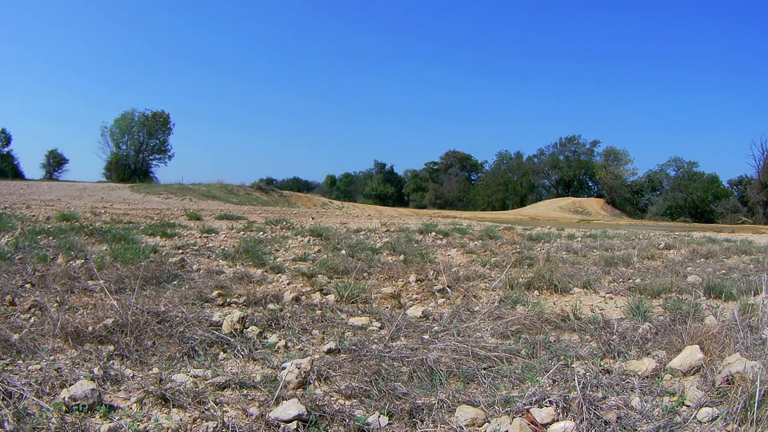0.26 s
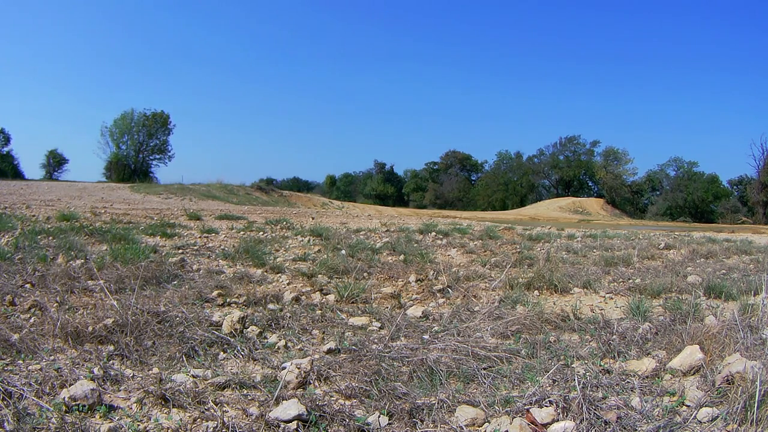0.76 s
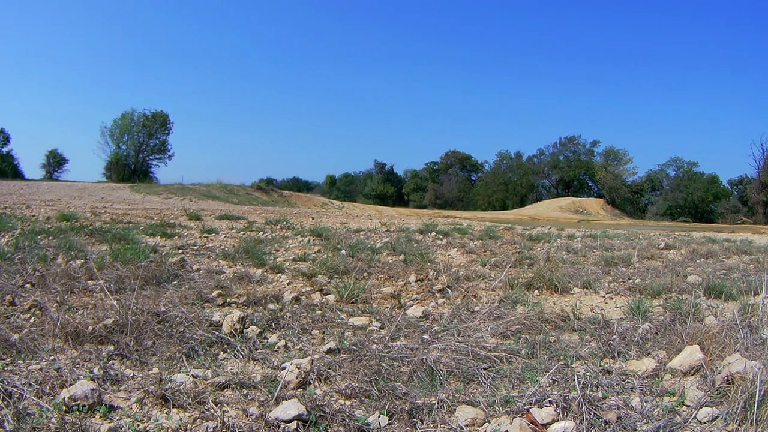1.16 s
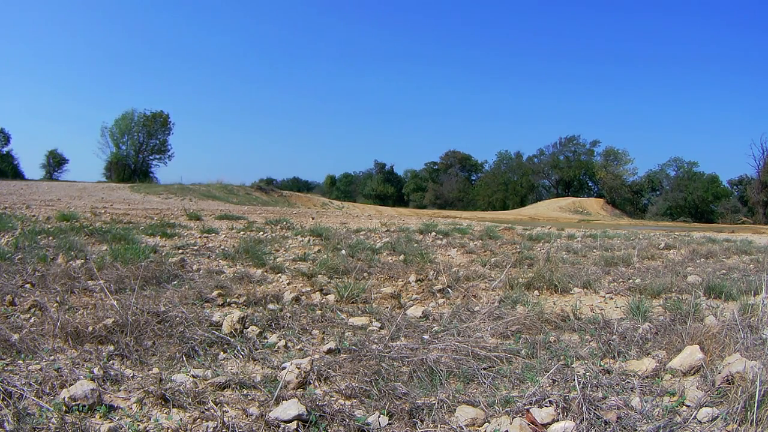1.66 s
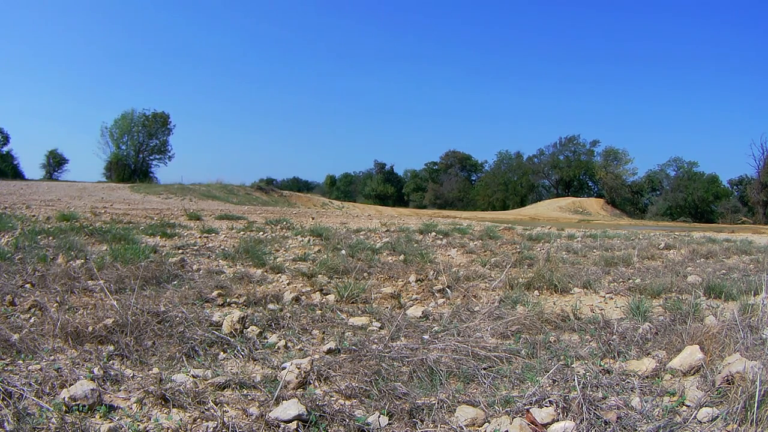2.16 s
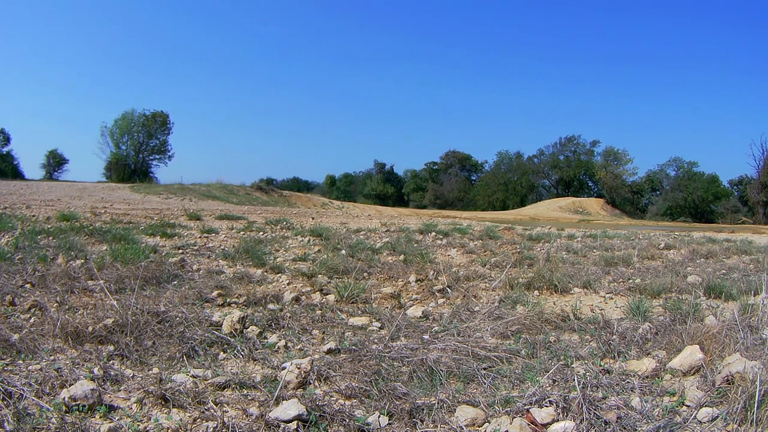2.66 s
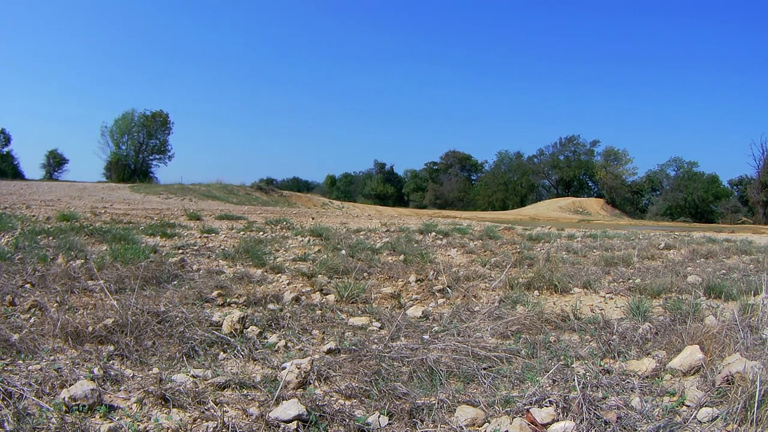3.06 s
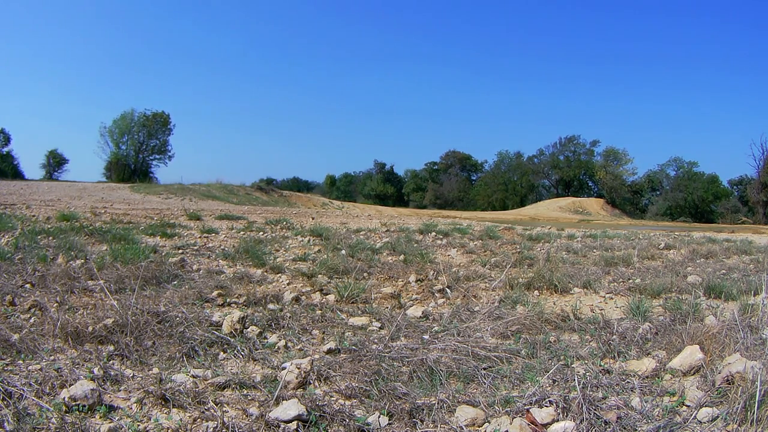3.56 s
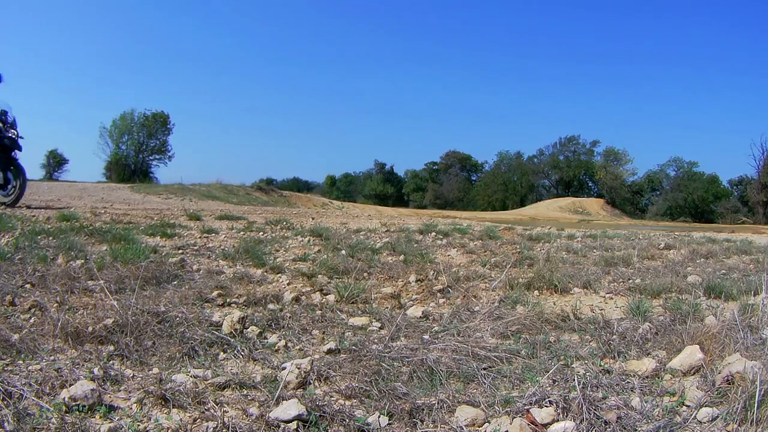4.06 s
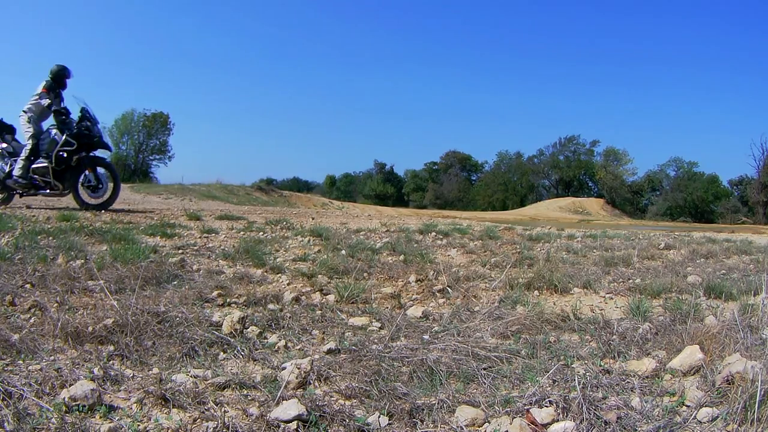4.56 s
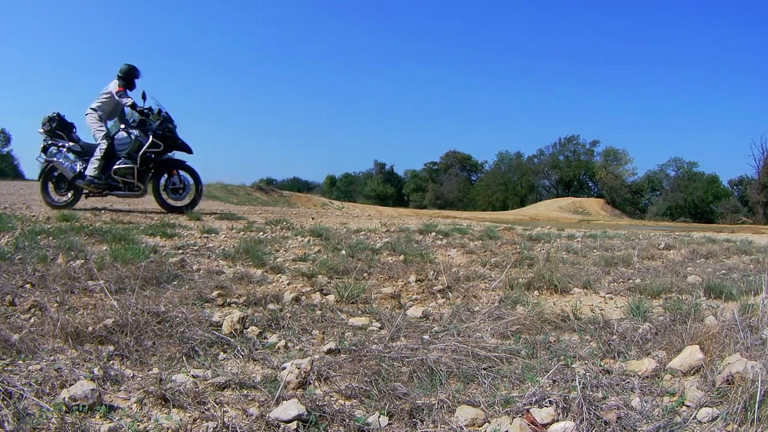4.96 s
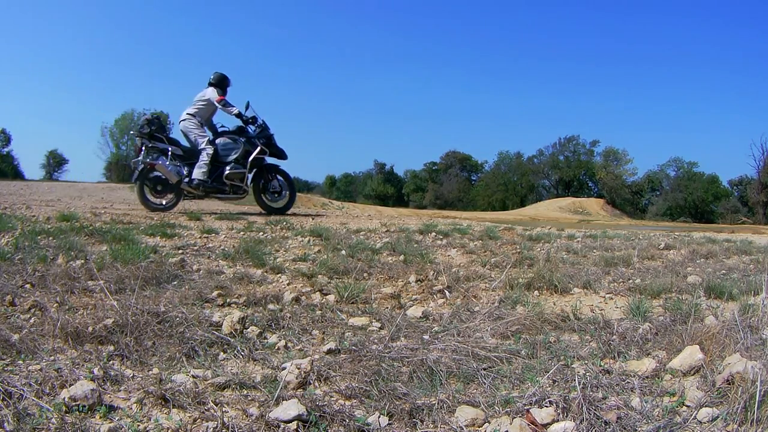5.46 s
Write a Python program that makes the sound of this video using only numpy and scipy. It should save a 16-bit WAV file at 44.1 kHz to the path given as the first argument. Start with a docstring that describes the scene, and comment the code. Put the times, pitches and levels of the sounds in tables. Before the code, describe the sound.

A twin-cylinder motorcycle thuds slowly closer just above idle, stones crunching under its tyres, with light wind on the microphone.

```python
"""An uneven strong-weak thudding is heard first: a twin-cylinder motorcycle, barely above idle, rolls
slowly closer over stony ground. Its exhaust pulses excite the silencer and pipe, while the engine
clatters, hisses and rings in step. Stones knock, crunch and snap under the tyres, the chassis thumps
and loose panels jangle. Gusts buffet the microphone as the bike nears; the camera whines faintly."""
import sys
import numpy as np
from scipy import signal
from scipy.fft import rfft, irfft
from scipy.io import wavfile
from scipy.ndimage import uniform_filter1d

SR = 44100
rng = np.random.default_rng(int(sys.argv[2]) if len(sys.argv) > 2 else 0)


def transcribe(u):
    """Save the signal u as a 16-bit wav file named by the first command-line argument.

    u: samples, shape (n,) or (channels, n), limited to [-1, 1]; the rate is SR.
    q: integer samples, one column per channel.
    """
    v = np.clip(np.atleast_2d(u).T, -1, 1)
    q = np.round(v * 32767).astype(np.int16)
    wavfile.write(sys.argv[1], SR, q)


N = 251370
TIME, FREQS = np.arange(N) / SR, np.fft.rfftfreq(N, 1 / SR)


def amp(db):
    """Decibels as an amplitude ratio."""
    return 10 ** (np.asarray(db) / 20)


def unit(x):
    """Normalisation to rms 1."""
    return x / np.sqrt(np.mean(x ** 2) + 1e-20)


def curve(table):
    """Linear interpolation of a time table at every sample."""
    return np.interp(TIME, *np.transpose(table))


def response(table, hz, column=1):
    """Magnitude response from a table in dB, rolling off beyond its ends."""
    columns = np.transpose(table)
    knots, db = columns[0], columns[column]
    knots = np.r_[knots[0] / 4, knots, knots[-1] * 3]
    db = np.r_[db[0] - 20, db, db[-1] - 35]
    return amp(np.interp(np.log(hz + 1), np.log(knots + 1), db))


def colour(x, table, column=1):
    """Zero-phase filtering by a spectrum table; rms 1."""
    return unit(irfft(rfft(x) * response(table, FREQS, column), N))


def impulse_response(table, column, size=16384):
    """Minimum-phase filter: the phase follows from the log magnitude by a Hilbert transform."""
    log_gain = np.log(response(table, abs(np.fft.fftfreq(size, 1 / SR)), column))
    return np.fft.ifft(np.exp(signal.hilbert(log_gain).conj())).real[:size // 4]


def drift(rate_hz):
    """Low-passed noise, a smooth random wandering; rms 1."""
    return unit(irfft(rfft(rng.standard_normal(N)) * np.exp(-(FREQS / rate_hz) ** 2), N))


def grains(per_s, spread_db):
    """Shot noise: tiny impacts of random time and size; rms 1."""
    size = amp(spread_db * np.minimum(rng.exponential(1, N), 4))
    return unit(size * rng.choice([-1, 1], N) * (rng.random(N) < per_s / SR))


def flutter(x, depth_db, width_hz=900, length_s=0.03):
    """Random amplitude modulation of each narrow band; rms 1."""
    hz, t, bands = signal.stft(x, SR, nperseg=256, noverlap=192)
    field = rng.standard_normal(bands.shape)
    field = uniform_filter1d(field, max(1, round(width_hz / hz[1])), axis=0)
    field = unit(uniform_filter1d(field, max(1, round(length_s / t[1])), axis=1))
    return unit(signal.istft(bands * amp(depth_db * field), SR, nperseg=256, noverlap=192)[1][:N])


def swell_power(events):
    """Incoherent addition: bell-shaped swells sum in power."""
    return sum(amp(db) ** 2 * np.exp(-((TIME - s) / half_s) ** 2) for s, half_s, db in events)


# The bike's path. Each row: time in seconds, distance from the microphone in metres.
PATH = [(0, 10.7), (1.2, 8.9), (2.5, 8.54), (3.2, 7.85), (3.6, 5.34), (4.15, 4.03), (5.7, 3.55)]
# The rider feathers the throttle. Each row: time in seconds, effort in dB.
EFFORT = [(0.04, -5.5), (0.32, -1), (0.58, -3.5), (0.85, -3.5), (0.97, -1), (1.18, -1.5), (1.65, -0.9),
          (1.95, 0), (2.14, -3.5), (2.33, 0), (2.55, -0.5), (2.74, 1.5), (2.9, -0.5), (3.02, 2), (5.35, 2),
          (5.55, 1)]
CLOSE_M, FAR_M = 3, 9.9


def carried_db(falloff, effort):
    """Geometric spreading (falloff 1 is the 1/r law), plus a share of the throttle's effort."""
    return -20 * falloff * np.log10(curve(PATH) / CLOSE_M) + effort * curve(EFFORT)


def nearness():
    """Proximity, from 0 far off towards 1 close by."""
    return np.clip((FAR_M - curve(PATH)) / (FAR_M - CLOSE_M), 0, 1)


def approaching(x, table):
    """Crossfade from a table's far spectrum to its close one."""
    near = nearness()
    return (1 - near) * colour(x, table) + near * colour(x, table, column=2)


def tailpipe_aim(pass_s=4.78, swing_s=0.2):
    """Directivity: 0 with the tailpipe turned away, 1 once it faces the microphone."""
    return .5 + .5 * np.tanh((TIME - pass_s) / swing_s)


# Engine speed, hunting near idle. Each row: time in seconds, four-stroke cycles per second.
ENGINE_SPEED = [(0.0, 22.962), (0.24, 21.959), (0.3, 22.709), (0.38, 23.038), (0.48, 21.631), (0.8, 22.55),
                (0.88, 21.444), (1.12, 23.37), (1.28, 20.421), (1.38, 21.706), (1.6, 22.042),
                (1.68, 20.847), (1.88, 22.071), (2.14, 21.32), (2.4, 21.443), (2.66, 21.097),
                (2.72, 22.559), (2.88, 19.794), (2.98, 21.4), (3.12, 22.107), (3.34, 20.54), (3.4, 21.104),
                (3.62, 20.477), (3.76, 21.569), (3.84, 20.815), (3.88, 21.532), (4.14, 20.914),
                (4.32, 22.877), (4.58, 21.556), (4.62, 21.799), (4.74, 21.072), (4.94, 24.338),
                (5.18, 23.535), (5.38, 24.747), (5.52, 22.377), (5.7, 25.779)]


def engine_cycles():
    """Phase is the integral of speed; whole numbers mark the stronger cylinder's pulses."""
    return np.cumsum(curve(ENGINE_SPEED)) / SR + .484


def exhaust_db(close_db=-38.0):
    """Spreading, throttle and directivity set the level; it dips slightly as the engine speeds up."""
    acceleration = uniform_filter1d(np.gradient(curve(ENGINE_SPEED)) * SR, size=SR // 10)
    return close_db + carried_db(falloff=0.72, effort=0.74) - 0.04 * acceleration + 1.5 * tailpipe_aim()


# Faltering burns in the stronger cylinder. Each row: time in seconds, change of level in dB.
FALTERS = [(.03, -4), (.068, -3.5), (.445, -7), (.56, -4), (1.19, -6), (2.07, -1.5), (5.545, -5)]


def burn_db(spread_db=1.05):
    """Cycle-to-cycle variation of combustion: every burn differs, and a few falter."""
    falter = sum(db * np.exp(-((TIME - s) / .03) ** 2) for s, db in FALTERS)
    return falter + spread_db * rng.standard_normal(N)


def firings(cycles, db):
    """Impulse train with one pulse a cycle."""
    count = np.floor(cycles)
    return np.diff(count, prepend=count[0]) * amp(db)


# The silencer. Each row: frequency in Hz, gain in dB for the stronger cylinder, then for the weaker.
SILENCER_RESPONSE = [(18, -56, -9), (43, -5, 0), (70, 0, -3.5), (98, 4.5, -4.5), (128, 4.5, -6),
                     (175, -3.5, -13), (215, -6, -14), (255, -12.5, -22), (320, -21, -31), (400, -22, -43),
                     (500, -50, -51), (1030, -64, -64)]


def exhaust(cycles, strong_db):
    """Source and filter: two unevenly spaced pulse trains thud through the low-pass silencer."""
    lag_cycles = .618 + .007 * drift(12)
    # The weaker cylinder gains more as the tailpipe swings round.
    weak_db = 0.8 + 2 * tailpipe_aim() + 1.8 * rng.standard_normal(N)
    strong_pulses, weak_pulses = firings(cycles, strong_db), firings(cycles - lag_cycles, weak_db)
    strong = signal.oaconvolve(strong_pulses, impulse_response(SILENCER_RESPONSE, column=1))[:N]
    weak = signal.oaconvolve(weak_pulses, impulse_response(SILENCER_RESPONSE, column=2))[:N]
    return -amp(exhaust_db()) * unit(strong + weak)


def pipe_ring(cycles, strong_db, hz=395, t60_s=0.042, lag_cycles=.045, puff_cycles=0.13):
    """Pipe resonance: the stronger pulse and its puff of turbulent gas excite a throaty note."""
    late = cycles - lag_cycles
    pulses = unit(firings(late, strong_db + rng.standard_normal(N)))
    gas = unit(rng.standard_normal(N) * np.exp(-(late % 1) / puff_cycles))
    t = TIME[:SR // 10]
    mode = amp(-60 * t / t60_s) * np.sin(2 * np.pi * hz * t)
    note = unit(signal.oaconvolve(pulses + 0.75 * gas, mode)[:N])
    return amp(exhaust_db() - 23.0 + 2.5 * nearness()) * note  # carries less far than the thud


# Valve gear bursts. Each row: start and length in cycles, relative strength in clatter, then in hiss.
VALVE_BURSTS = [(.135, 0.14, 0.17, 0.74), (0.549, 0.13, 1.24, 0.62), (0.81, 0.081, 1, 0.79)]


def valve_beat(cycles, steady, column):
    """Envelope of the valve gear: fast-rising, decaying bursts add in power to steady rubbing."""
    power = steady ** 2
    for burst in VALVE_BURSTS:
        phase = cycles - burst[0]
        age = 3 * (phase % 1) / burst[1]
        force = rng.uniform(.55, 1.45, 200)[np.floor(phase).astype(int) + 1]  # one value a cycle
        power = power + (burst[column] * force * age * np.exp(1 - age)) ** 2
    return unit(np.sqrt(power))


def repeating_contacts(cycles, size=2048):
    """Periodic noise: one pattern of metal contacts recurs every cycle; rms 1."""
    place = (cycles % 1) * size
    return unit(np.interp(place, np.arange(size), rng.standard_normal(size), period=size))


# The clatter's spectrum. Each row: frequency in Hz, relative level in dB far off, then close by.
CLATTER_SPECTRUM = [(160, -2.5, 6.5), (310, 5.5, 3.5), (406, 5.5, 6.5), (537, -4.5, 5.5), (528, 6.5, 5.5),
                    (662, -4, 0), (735, 0, 5.5), (844, -2, 2), (996, -2, 2.5), (1140, -7.5, 0.5),
                    (1250, -3, -0.5), (1474, -9.5, -0.5), (1890, -14.5, -8), (2520, -19, -11.5),
                    (3100, -19, -26), (5000, -17, -20.5)]


def clatter(cycles, gain_db=-47.0):
    """Impact noise: partly periodic contacts rattle the crankcase, mixed with gravel under the tyres."""
    contacts = .4 * repeating_contacts(cycles) + rng.standard_normal(N)
    rattle = unit(contacts * valve_beat(cycles, steady=1.0, column=2))
    gravel = grains(per_s=300, spread_db=2.0)
    drive = flutter(rattle + 0.41 * gravel, depth_db=1.58, width_hz=400, length_s=0.031)
    return amp(gain_db + carried_db(falloff=0.92, effort=0.74)) * approaching(drive, CLATTER_SPECTRUM)


# The hiss's spectrum. Each row: frequency in Hz, relative level in dB far off, then close by.
HISS_SPECTRUM = [(1850, -11, -10.5), (3030, -13, -22.5), (3670, -14.5, -12), (4420, -8.5, -3.5),
                 (4770, -12.5, -10.5), (6400, -7.5, -5.5), (7070, -4.5, -4), (7950, -9, -9.5),
                 (8040, -16, -14), (9080, -4, -1), (9850, 1, 1), (11600, -6.5, -8), (12600, -6.5, -6),
                 (14500, -13, -13), (16100, -2, -12.5)]


def hiss(cycles, gain_db=-46.0):
    """Modulated noise: bright metal ticks ring briefly in the dense modes of the cooling fins."""
    beat = valve_beat(cycles, steady=0.89, column=3) * amp(1.06 * drift(40))
    ticks = beat * (rng.standard_normal(N) + 0.44 * grains(per_s=2600, spread_db=3.0))
    t = TIME[:SR // 50]
    fins = rng.standard_normal(len(t)) * np.exp(-t / .003)
    ringing = signal.oaconvolve(ticks, fins / np.linalg.norm(fins))[:N]
    drive = flutter(ticks + .28 * ringing, depth_db=1.52)
    return amp(gain_db + carried_db(falloff=1.0, effort=0.95)) * approaching(drive, HISS_SPECTRUM)


# Rubbing metal. Each row: frequency and half-width in Hz, relative level in dB far off, then close by.
METAL_MODES = [(6874, 270, -5, 1.5), (7240, 50, -4.5, -2.5), (7480, 190, 0.5, -5.5), (7860, 140, -10, 1),
               (10510, 900, -0.5, 3)]
# The ring's rise and fall. Each row: time in seconds, added gain in dB.
METAL_GAIN = [(0.05, -3.5), (0.35, -0.5), (1.4, -3.5), (2.4, -9.5), (3.9, 3), (4.55, 0), (4.75, -4),
              (5.7, -17)]


def metal_ring(cycles, gain_db=-51.5, waver_db=3.2):
    """Frictional excitation: rubbing keeps a few high modes singing, each wavering on its own."""
    near, beat = nearness(), valve_beat(cycles, steady=0.31, column=3)
    ring, power = np.zeros(N), np.zeros(N)
    for centre, width, far_db, near_db in METAL_MODES:
        rub = rng.standard_normal(N) * beat * amp(waver_db * drift(34))
        mode = unit(irfft(rfft(rub) / (1 + 1j * (FREQS - centre) / width) ** 2, N))
        weight = amp(far_db + near * (near_db - far_db))
        ring += weight * mode
        power += weight ** 2
    level_db = gain_db + carried_db(falloff=0.57, effort=0.73) + curve(METAL_GAIN)
    return amp(level_db) * ring / np.sqrt(power)


# Gusts. Each row: time of the peak and half-length in seconds, peak level in dB.
WIND_GUSTS = [(1.467, 0.03, -55), (1.673, 0.11, -48.5), (3.394, 0.072, -43.5), (3.82, 0.25, -42),
              (4.084, 0.29, -40.5), (4.312, 0.24, -40), (5.06, 0.05, -39.5), (5.31, 0.17, -41.5)]
# The rumble's spectrum. Each row: frequency in Hz, relative level in dB.
RUMBLE_SPECTRUM = [(8, -44), (22, -5), (42, -0.5), (80, -4), (130, -13), (200, -15), (300, -22), (600, -51),
                   (1500, -55)]


def wind(breeze_db=-59, draught_db=10.5):
    """Turbulent pressure at the microphone: gusts ride on a rumble that grows as the bike nears."""
    power = amp(breeze_db + draught_db * nearness()) ** 2 + swell_power(WIND_GUSTS)
    eddies = rng.standard_normal(N) * amp(2.0 * drift(13.5))
    return np.sqrt(power) * colour(eddies, RUMBLE_SPECTRUM)


def impacts(events, modes, scrape, scrape_s, soft_hz=1700):
    """Modal synthesis: each blow and its short scrape excite the damped modes of the body struck."""
    t, out = TIME[:SR // 8], np.zeros(N)
    cushion = signal.butter(2, soft_hz, fs=SR, output="sos")  # rubber and earth soften every blow
    for start_s, db, pitch in events:
        ring = sum((-1) ** k * amp(level - 60 * t / t60) * np.sin(2 * np.pi * hz * pitch * t)
                   for k, (hz, level, t60) in enumerate(modes))
        friction = rng.standard_normal(len(t)) * np.exp(-t / scrape_s)
        blow = (t == 0) + scrape * friction / np.linalg.norm(friction)
        sound = signal.sosfilt(cushion, signal.fftconvolve(blow, ring)[:len(t)])
        part = out[round(start_s * SR):][:len(t)]
        part += (amp(db) * sound / abs(sound).max())[:len(part)]
    return out


# Stones under the tyres. Each row: start in seconds, peak level in dB, pitch factor.
STONE_HITS = [(.403, -39.5, 1.03), (.4075, -47, 0.88), (.4255, -49, 1.2), (1.585, -45, 1), (1.5905, -39, 1),
              (1.611, -46, 0.99), (1.6195, -34, 0.95), (2.849, -42.5, 1.03), (3.1715, -44, 1.33),
              (3.3435, -42.5, 0.96), (3.399, -40.5, 1), (3.668, -37, 1.2), (3.6895, -35.5, 1.06),
              (3.936, -44, 0.56), (4.149, -39, 0.88), (4.281, -35, 0.91), (5.369, -39, 0.87)]
# A stone's modes. Each row: frequency in Hz, relative level in dB, 60 dB decay time in seconds.
STONE_RESONANCES = [(586, 9.5, 0.053), (750, 9.5, 0.016), (1037, 12, 0.017), (1310, 6, 0.019),
                    (1610, 1, 0.015)]


def stone_knocks():
    """Impact excitation: stones knock against the ground, each at a pitch set by its size."""
    return impacts(STONE_HITS, STONE_RESONANCES, scrape=0.45, scrape_s=0.005, soft_hz=2200)


# Jolts on rough ground. Each row: start in seconds, peak level in dB, pitch factor.
JOLTS = [(1.4395, -38, 1.5), (1.4695, -52, 0.9), (1.6315, -42, 1.1), (1.689, -42, 1.8), (1.6965, -42, 2.2),
         (3.3838, -32, 0.54), (3.419, -34, 1.6), (3.812, -34, 0.39), (3.8705, -33, 0.42), (3.935, -26, 1.3),
         (4.0295, -22, 1.5), (4.0412, -23, 1.4), (4.139, -26.5, 0.96), (4.2965, -25.5, 1.2),
         (4.3265, -39, 1.6), (5.463, -22, 1.3)]
# A thump's modes. Each row: frequency in Hz, relative level in dB, 60 dB decay time in seconds.
THUMP_RESONANCES = [(83, 12, 0.02), (173, -18, 0.0096)]


def thumps():
    """Heavy damping: each jolt excites low modes that die within a few periods."""
    return impacts(JOLTS, THUMP_RESONANCES, scrape=0.25, scrape_s=0.0041)


# Loose gravel. Each row: time of the peak and half-length in seconds, peak level in dB.
GRAVEL_PATCHES = [(1.46, 0.031, -57), (2.73, 0.056, -55), (3.39, 0.039, -49.5), (3.5, 0.073, -65),
                  (3.935, 0.011, -45.5), (4.135, 0.02, -46), (4.225, 0.013, -44), (4.3, 0.037, -50),
                  (4.68, 0.012, -46), (4.96, 0.013, -43.5)]
# The crunch's spectrum. Each row: frequency in Hz, relative level in dB.
GRAVEL_SPECTRUM = [(300, 3.5), (600, -2.5), (1300, -7.5), (2200, -18.5), (3100, -23), (4400, -16.5),
                   (5500, -17), (7300, -4), (8400, -18), (10000, -0.5), (15000, -17)]


def gravel_crunch():
    """Filtered shot noise: showers of small stones are squeezed out from under the tyres."""
    shower = colour(grains(per_s=1100, spread_db=-1.0), GRAVEL_SPECTRUM)
    return np.sqrt(swell_power(GRAVEL_PATCHES)) * shower


# Bumps. Each row: start in seconds, peak level in dB, pitch factor.
BUMPS = [(2.241, -33.5, 1.0), (4.0365, -29.5, 0.696)]
# The chassis's modes. Each row: frequency in Hz, relative level in dB, 60 dB decay time in seconds.
CHASSIS_RESONANCES = [(302, 2, 0.053), (575, 1, 0.047), (730, -9, 0.03), (915, -6, 0.032)]


def chassis_clunks():
    """Structural resonance: the chassis answers a bump with a hollow clunk."""
    return impacts(BUMPS, CHASSIS_RESONANCES, scrape=0.44, scrape_s=0.0072)


# Loose panels and guards. Each row: start in seconds, level in dB, frequency in Hz.
PANEL_NOTES = [(4.228, -45.5, 1410), (4.268, -39, 949), (4.303, -48, 1340), (4.355, -46, 935),
               (4.852, -43.5, 1224), (4.893, -48, 1206), (4.935, -45, 1085), (5.02, -46, 785),
               (5.265, -45.5, 1427), (5.315, -44, 808), (5.43, -41, 1038), (5.495, -45, 962)]


def panel_jangles(rise_s=.004, t60_s=.15):
    """Free vibration: as the bike rocks, thin metal swells at one pitch and decays exponentially."""
    out = np.zeros(N)
    for start_s, db, hz in PANEL_NOTES:
        t = np.maximum(TIME - start_s, 0)
        envelope = (1 - np.exp(-t / rise_s)) * amp(db - 60 * t / t60_s)
        out += envelope * np.sin(2 * np.pi * hz * t)
    return out


# Single pebbles. Each row: start in seconds, peak level in dB, pitch factor.
PEBBLE_HITS = [(4.5111, -33.5, 1.03), (5.1062, -45, 0.94), (5.1282, -39, 0.89), (5.2973, -40, 0.97),
               (5.5248, -43, 0.86)]
# A pebble's modes. Each row: frequency in Hz, relative level in dB, 60 dB decay time in seconds.
PEBBLE_RESONANCES = [(4030, -3.5, .008), (4480, -7.5, .01), (5440, -4, .004), (6800, 6, .004),
                     (9800, 0, .003)]


def pebble_snaps():
    """Hard contact has a wide bandwidth: pebbles snap under the tyres in high, brief modes."""
    return impacts(PEBBLE_HITS, PEBBLE_RESONANCES, scrape=1.0, scrape_s=0.004, soft_hz=9000)


def scene():
    """Superposition in a free field: bike, ground and wind add with no echo."""
    cycles, strong_db = engine_cycles(), burn_db()
    # In passing, the engine ends up farther off than the tailpipe, so its ticking arrives later.
    passed = .5 + .5 * np.tanh((TIME - 4.7) / 0.42)
    valve_cycles = cycles - 0.085 * passed
    thudding = exhaust(cycles, strong_db) + pipe_ring(cycles, strong_db)
    engine = clatter(valve_cycles) + hiss(valve_cycles) + metal_ring(valve_cycles)
    ground = stone_knocks() + gravel_crunch() + pebble_snaps()
    frame = chassis_clunks() + thumps() + panel_jangles()
    return (thudding + engine + ground + frame + wind())[None]


def record(dry, whine_hz=13701, whine_db=-73.5, cutoff_hz=15720):
    """Band limiting: the camera adds its thin, wavering whine and cuts the highest treble."""
    phase = 2 * np.pi * np.cumsum(whine_hz + 3.4 * drift(9.0)) / SR
    whine = amp(whine_db + 2.0 * drift(6.5)) * np.sqrt(2) * np.sin(phase)
    low_pass = signal.firwin(1023, cutoff_hz, window=("kaiser", 9), fs=SR)
    return signal.oaconvolve(dry + whine, low_pass[None], "same")


dry = scene()
out = record(dry)
transcribe(out)
```